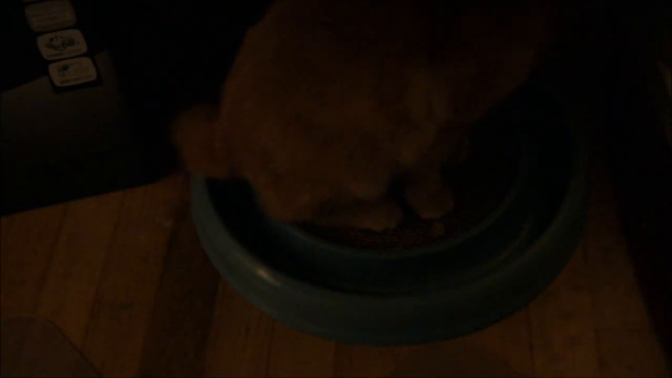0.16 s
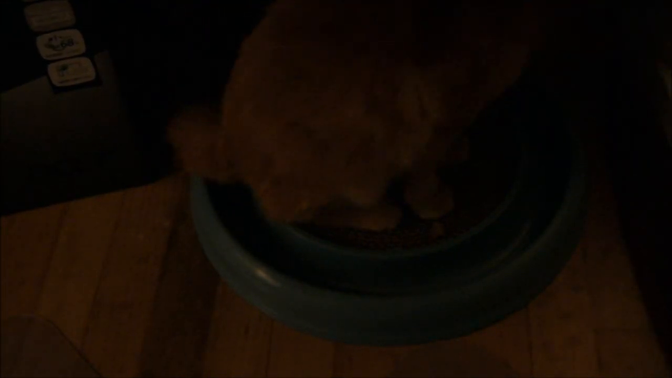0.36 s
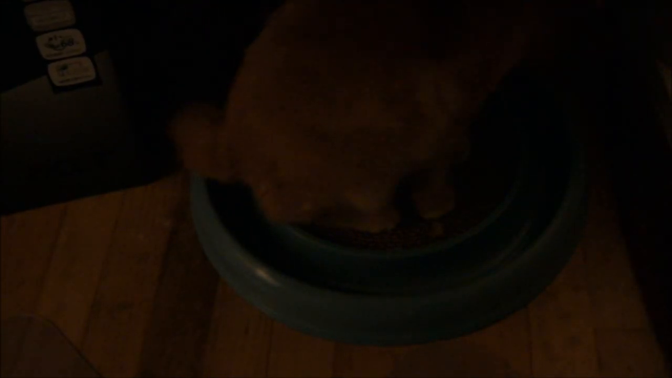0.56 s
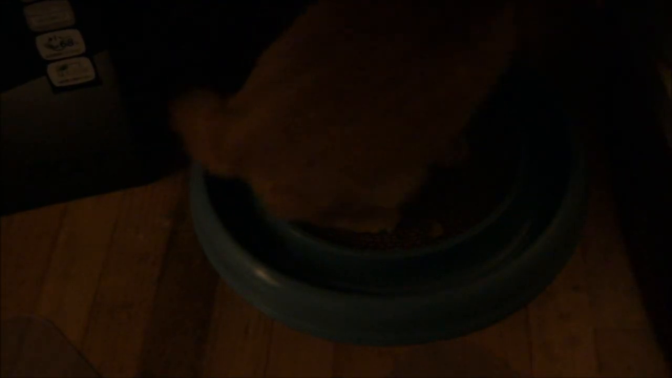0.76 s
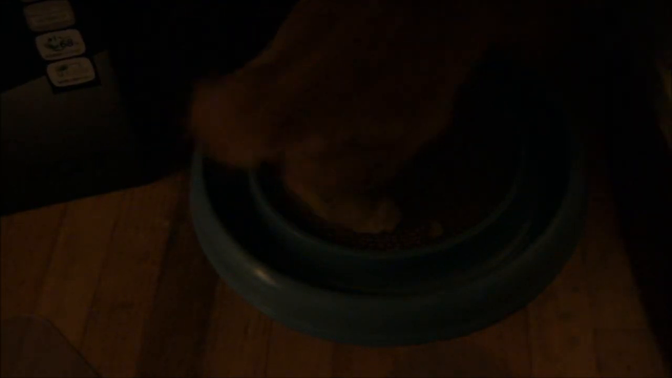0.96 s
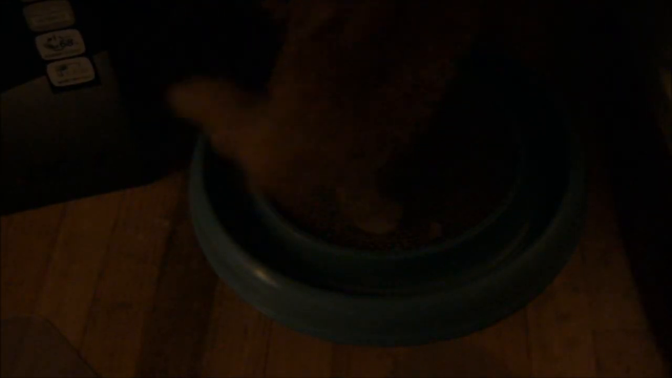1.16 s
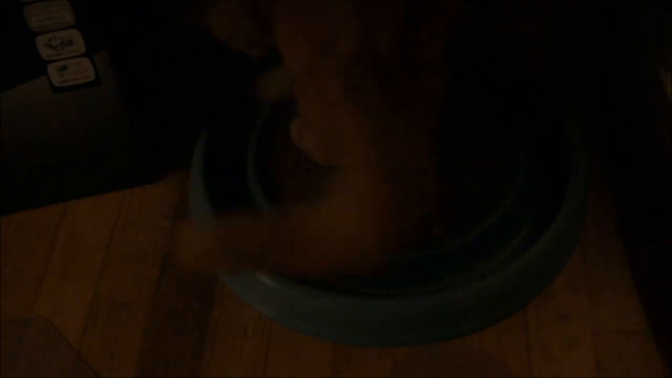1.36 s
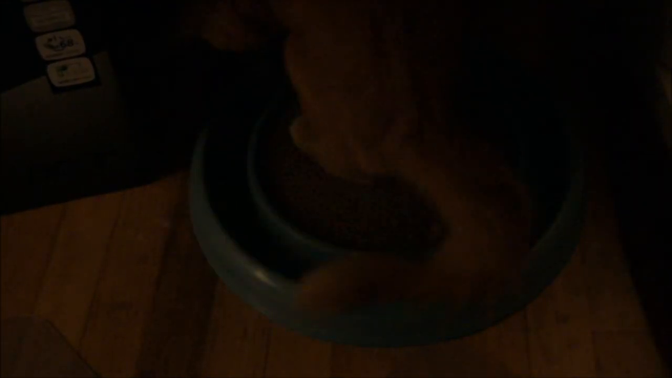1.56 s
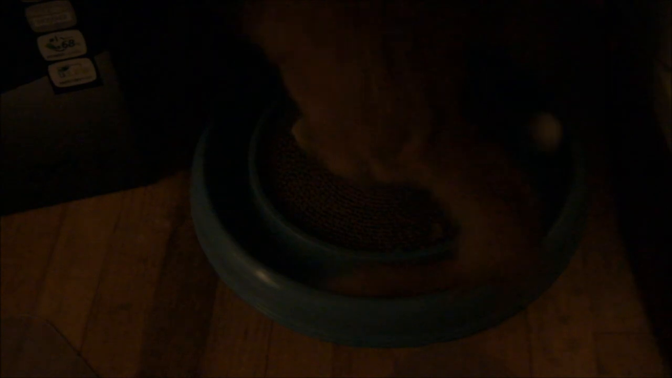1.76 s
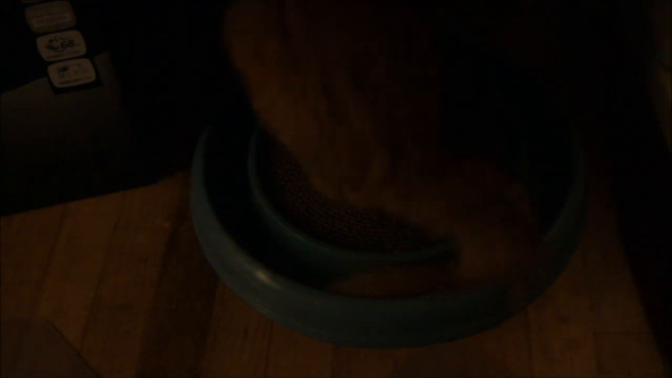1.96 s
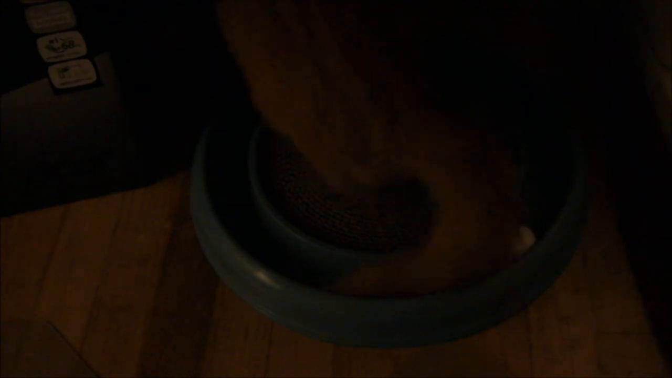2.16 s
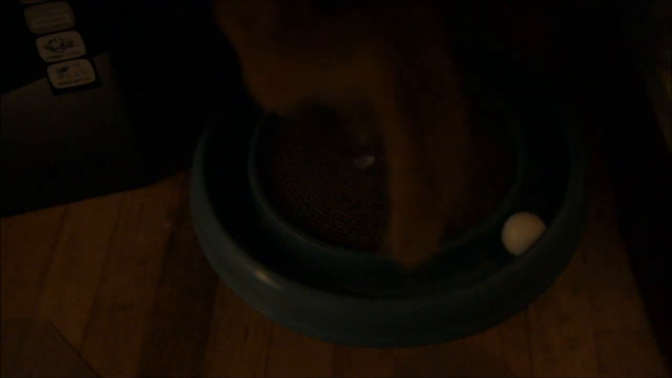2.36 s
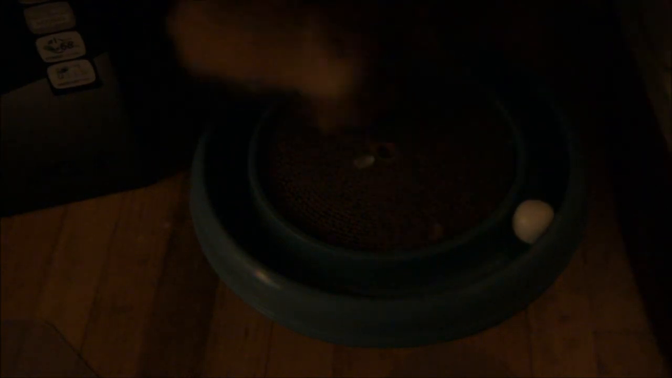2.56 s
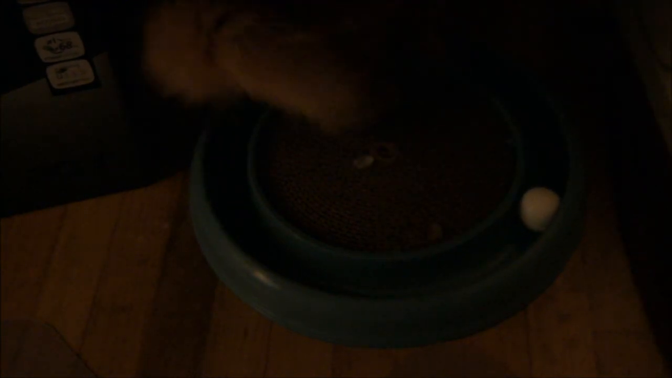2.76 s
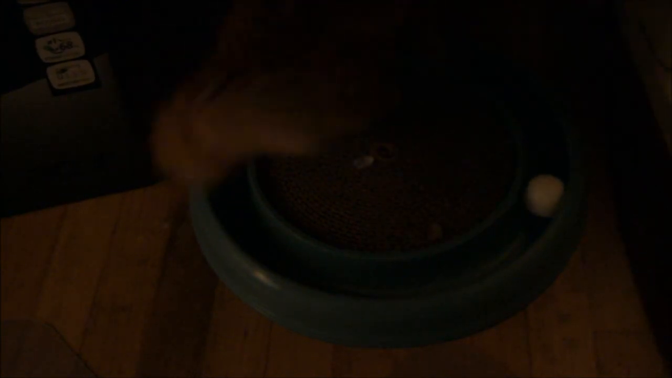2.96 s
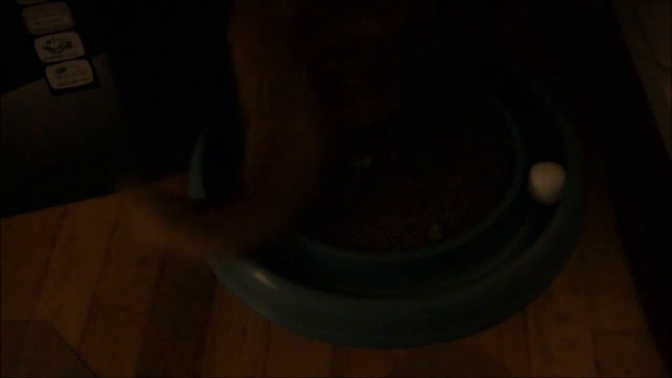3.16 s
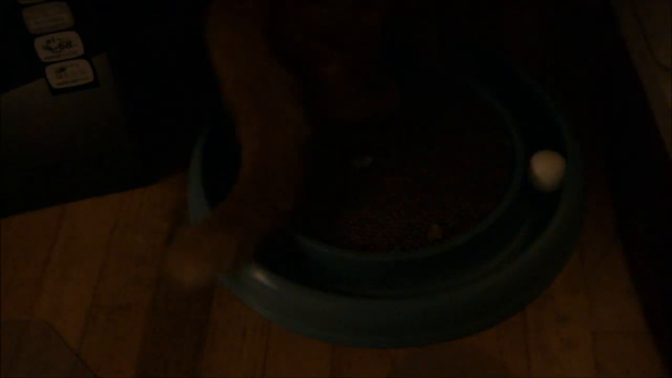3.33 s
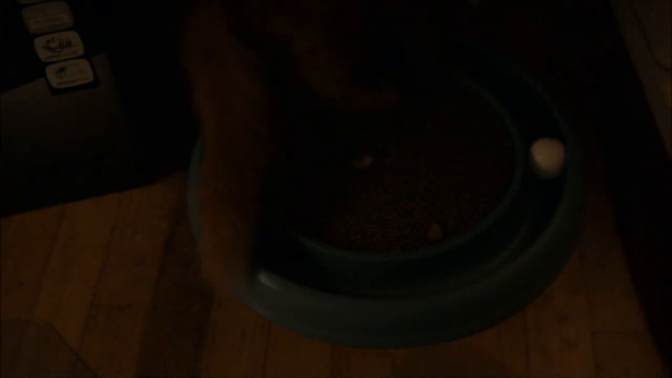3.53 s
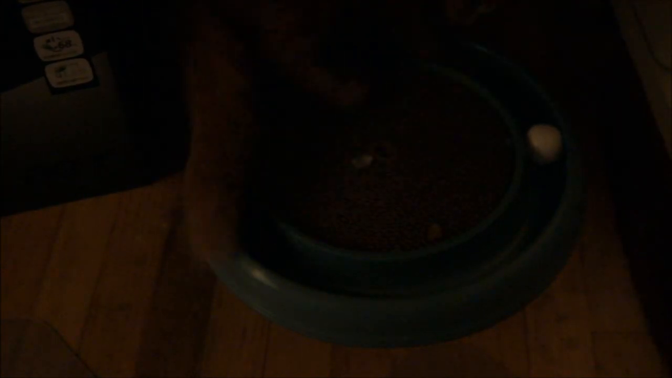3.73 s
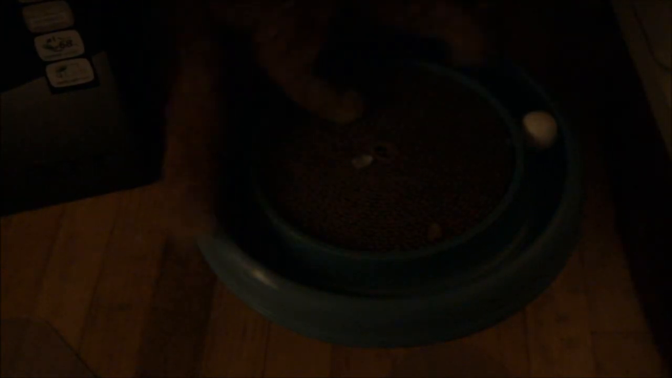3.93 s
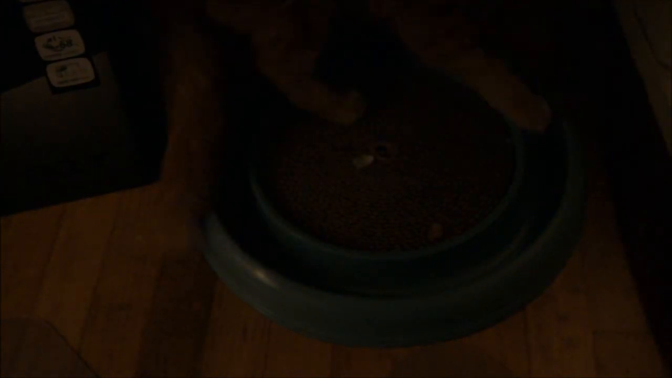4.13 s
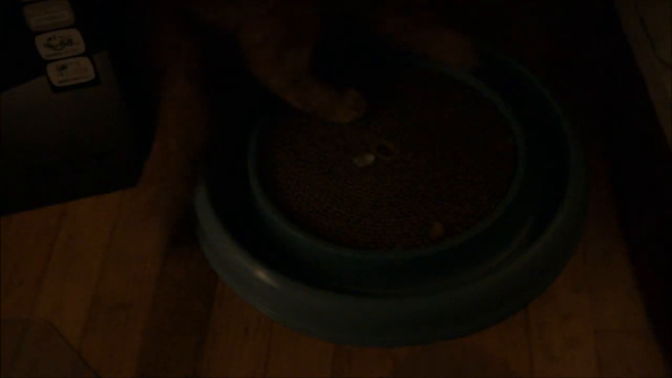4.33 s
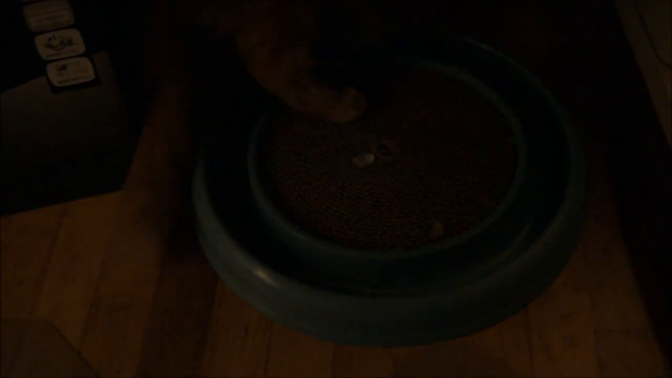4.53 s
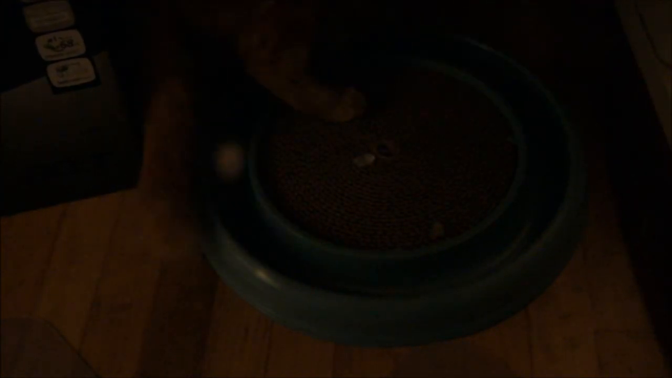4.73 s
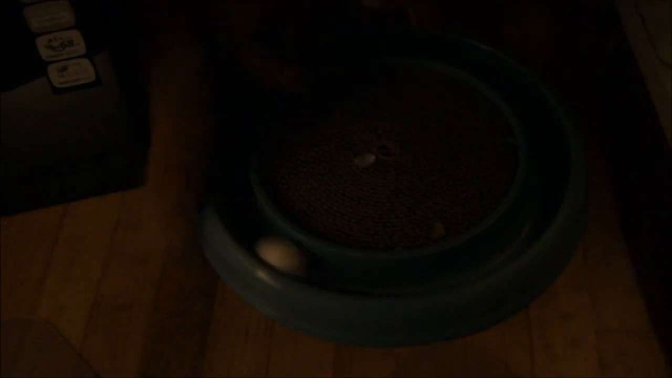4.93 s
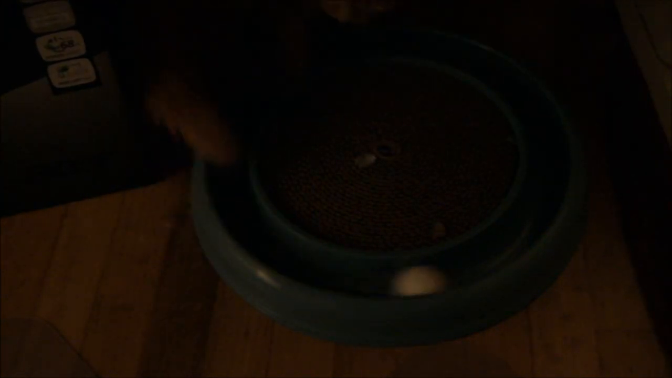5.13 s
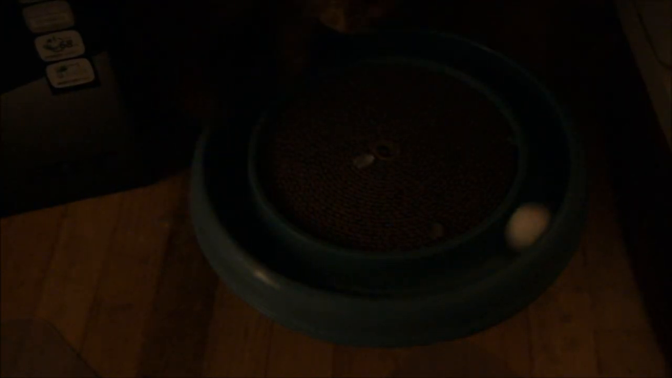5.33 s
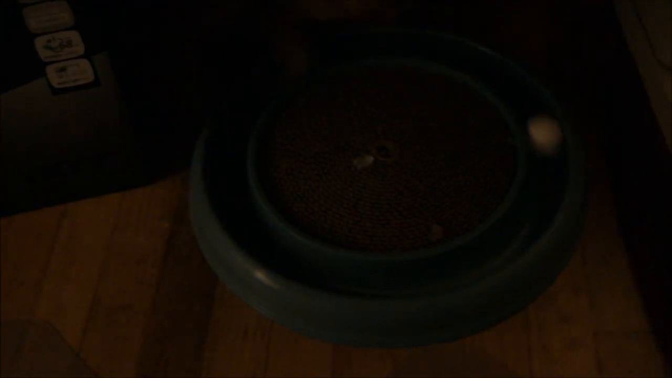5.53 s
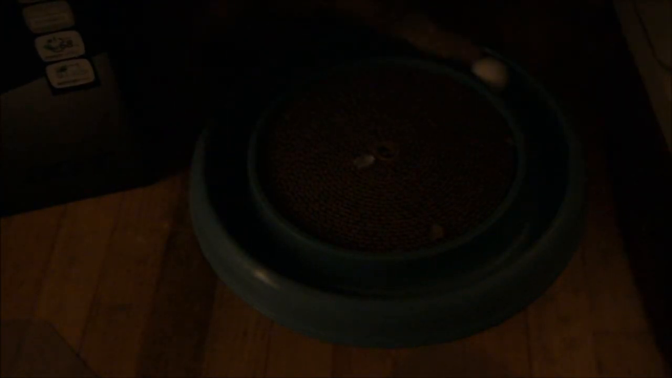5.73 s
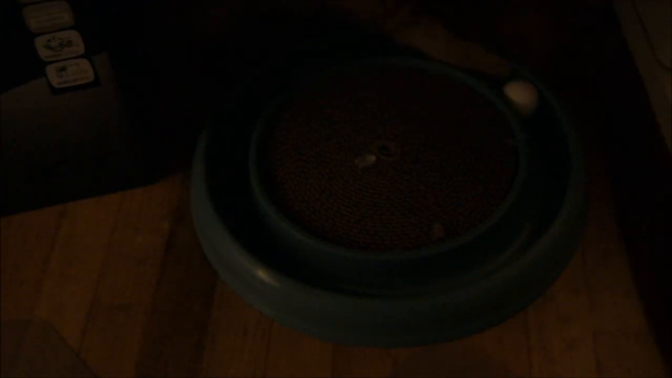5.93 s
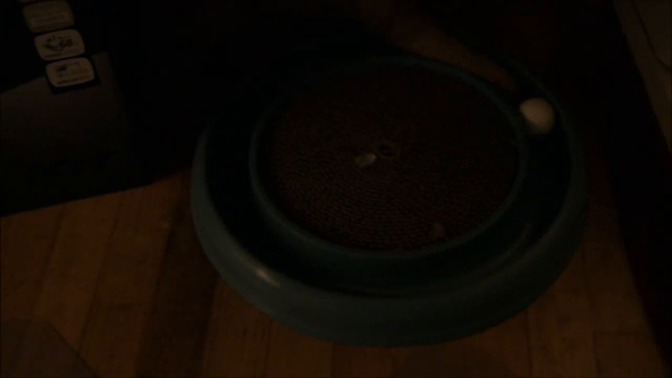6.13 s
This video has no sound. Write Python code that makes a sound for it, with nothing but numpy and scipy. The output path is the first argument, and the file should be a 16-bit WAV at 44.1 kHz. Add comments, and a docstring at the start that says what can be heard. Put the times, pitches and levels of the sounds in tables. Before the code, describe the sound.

In a small quiet room, a cat bats a light ball round a hollow plastic track. A few faint knocks come first, then a burst of loud hollow thumps and rolling rattle, a lull with small taps, and a longer second run of clattering that stops on a hard knock. Fur rustles softly; close stereo microphone, faint room hush.

```python
"""First a few light knocks over a faint roll, then bursts of batting: a cat drives a plastic ball round
a hollow plastic track on a wooden floor, in a small quiet room.
Bumps of the roll and knocks on the groove's walls excite the same shell modes; contacts also tick.
Paws and fur rustle as patchy filtered noise; a far appliance adds thin tones to the hush of the room.
The microphone housing cuts narrow dips into everything."""
import sys
import numpy as np
from scipy import signal
from scipy.fft import rfft, irfft
from scipy.io import wavfile

SR = 44100
rng = np.random.default_rng(int(sys.argv[2]) if len(sys.argv) > 2 else 0)


def file_out(sig):
    """Save sig as 16-bit WAV at sys.argv[1]."""
    # one column per channel
    cols = np.atleast_2d(sig).T
    # limit, then scale
    lim = np.clip(cols, -1, 1)
    pcm = np.round(lim * 32767).astype(np.int16)
    wavfile.write(sys.argv[1], SR, pcm)


def gain_from_db(level_db):
    """Convert decibel levels to linear amplitude factors (20 dB per decade)."""
    decades = np.asarray(level_db, float) / 20
    return 10 ** decades


N = 272979  # samples
LEFT_RIGHT = np.array([[1], [-1]])  # a side signal enters the two channels with opposite signs


def colour(x, db_of_hz):
    """Minimum-phase filtering: a folded cepstrum gives a causal response with the given dB gain over Hz."""
    size = 4096
    hz = np.arange(size // 2 + 1) * SR / size
    cepstrum = irfft(np.log(gain_from_db(db_of_hz(hz))))
    cepstrum[1:size // 2] *= 2
    cepstrum[size // 2 + 1:] = 0
    response = irfft(np.exp(rfft(cepstrum)))[:size // 2]
    return signal.oaconvolve(x, response)[:len(x)]


def shape(points):
    """Logarithmic frequency scale: straight lines through (Hz, value) points."""
    hz, value = np.transpose(points)
    return lambda f: np.interp(np.log(f + 1), np.log(hz), value)


def unit(x):
    """Normalisation to an rms value of 1."""
    return x / np.sqrt(np.mean(x ** 2))


def walk(rate):
    """Slow random modulation: levels 1 / rate s apart joined by smooth steps, rms 1."""
    place = np.arange(N) * rate / SR
    levels = rng.standard_normal(int(place[-1]) + 2)
    k = place.astype(int)
    part = (place - k) ** 2 * (3 - 2 * (place - k))
    return unit(levels[k] + part * (levels[k + 1] - levels[k]))


def spikes(per_second, spread_db):
    """Impulsive noise: random clicks of either sign, a few much larger than the rest."""
    happens = rng.random(N) < per_second / SR
    return unit(happens * rng.standard_normal(N) * gain_from_db(spread_db * rng.exponential(size=N)))


def ring(x, hz, t60):
    """Damped resonance: a two-pole filter rings one mode, to a peak near 1 for a unit blow."""
    pole = np.exp(2j * np.pi * hz / SR - np.log(1000) / (t60 * SR))
    return signal.lfilter([0, pole.imag], [1, -2 * pole.real, abs(pole) ** 2], x)


# spectrum of the room's hush: pitch_hz [Hz], level_db [dB, relative density]
HUSH_SPECTRUM = [(30, -14.5), (60, -14.5), (92, -21.5), (160, -7), (250, 1), (500, -4.5), (800, -3),
                 (1250, -6.5), (1900, -14), (2900, -8), (4200, -16), (7000, -28), (14000, -39.5)]
# likeness of the hush at left and right: pitch_hz [Hz], likeness [0-1]
HUSH_LIKENESS = [(60, 0.9), (130, 0.94), (290, 0.86), (630, 0.34), (1380, 0.3), (3020, 0.1), (6610, 0.07),
                 (14500, 0.05)]
# thin tones of the appliance: pitch_hz [Hz], level_db [dB rms, before slow drift and the microphone]
APPLIANCE_TONES = [(1197, -62), (1920, -79), (3001, -84), (10680, -83)]
HUSH_DB = -54.5  # level of the part common to both channels


def air():
    """Diffuse noise, coherent in the bass and less so above, with drifting tones of a distant appliance."""
    def likeness(f):
        return np.clip(shape(HUSH_LIKENESS)(f), .01, .97)

    def side_db(f):
        return shape(HUSH_SPECTRUM)(f) + 10 * np.log10((1 - likeness(f)) / (1 + likeness(f)))

    def restless_noise():
        return rng.standard_normal(N) * gain_from_db(0.7 * walk(19))

    mid = colour(restless_noise(), shape(HUSH_SPECTRUM))
    side = colour(restless_noise(), side_db)
    both = (mid + side * LEFT_RIGHT) * gain_from_db(HUSH_DB) / np.std(mid)
    for hz, db in APPLIANCE_TONES:
        phase = 2 * np.pi * np.cumsum(hz + 1.52 * walk(6)) / SR
        level = gain_from_db(db + 0.29 * walk(4.7)) * np.sqrt(2)
        both = both + level * np.sin(phase + 0.3 * LEFT_RIGHT)
    return both


# decay of the echoes: pitch_hz [Hz], t60_s [s]
ROOM_DECAY = [(200, 0.18), (1000, 0.19), (4000, 0.12), (12000, 0.23)]
# colour of the side part of the echoes: pitch_hz [Hz], level_db [dB]
ROOM_WIDTH = [(150, -18), (500, -10.5), (1000, -6.5), (2500, 1.5), (8000, 3)]


def room(x):
    """Reverberation: close walls answer with dense noise tails that decay by band and widen in the treble.
    The ball keeps moving, so three places on the track take turns, each with its own echoes."""
    t = np.arange(int(.3 * SR)) / SR
    edges = np.geomspace(100, 16000, num=9)
    tail = 0
    for lo, hi in zip(edges, edges[1:]):
        bandpass = signal.butter(2, [lo, hi], "bandpass", fs=SR, output="sos")
        band = signal.sosfilt(bandpass, rng.standard_normal((3, 2, len(t))))  # places, mid and side, time
        decay = 1000. ** (-t / shape(ROOM_DECAY)(lo))
        tail = tail + band * decay * np.clip(t / 0.0013, 0, 1)
    tail = tail / np.linalg.norm(tail, axis=-1, keepdims=True)
    share = gain_from_db([5 * walk(9) for _ in tail])
    share = share / np.linalg.norm(share, axis=0)
    echoes = signal.oaconvolve((x * share)[:, None], tail, axes=-1)
    mid, side = echoes.sum(axis=0)[:, :N]
    return x + gain_from_db(-5) * mid + gain_from_db(-5.5) * colour(side, shape(ROOM_WIDTH)) * LEFT_RIGHT


# course of the roll: start_s [s], level_db [dB, relative], boom_db [dB, extra for the low modes,
# most on the far side of the ring]
ROLL_COURSE = [(0.0, -53, 3), (0.22, -60.5, 0.5), (1.2, -61.5, -8.5), (1.3, -51.5, 1), (1.45, -44.5, 1),
               (1.59, -41, 1.5), (1.71, -39.5, 6), (1.78, -35.5, -1.5), (1.93, -39, 1.5), (1.98, -40.5, -3),
               (2.08, -44, 2), (2.15, -55, -4.5), (2.72, -57, -11), (4.12, -57.5, -4), (4.24, -47.5, -3),
               (4.36, -41.5, 5.5), (4.45, -36, -2.5), (4.59, -37.5, -3.5), (5.0, -36.5, -8),
               (5.38, -38.5, -11.5), (5.41, -46.5, -1.5), (5.55, -43.5, 1), (5.69, -41, 3),
               (5.82, -38.5, 0.5), (5.85, -55, -5), (5.95, -57, 3), (6.19, -55.5, -1.5)]


def roll_levels():
    """Slow envelope: the roll level and its boom follow straight lines in dB."""
    s, roll_db, boom_db = np.transpose(ROLL_COURSE)
    t = np.arange(N) / SR
    return np.interp(t, s, roll_db), np.interp(t, s, boom_db)


# ball or paw hits the track: start_s [s], peak_db [dB, relative], boom_db [dB, extra for the low modes],
# hardness_db [dB, extra for the high modes and the tick]
BLOWS = [(0.012, -44, 2, -14), (0.047, -32.5, -5, -5.5), (0.073, -37, 5, -10.5), (0.119, -27.5, -0.5, -7),
         (0.238, -46, 1.5, -10), (0.593, -32.5, -1.5, -12.5), (1.266, -32.5, -4, -7.5),
         (1.285, -41, 6, 6.5), (1.409, -36, 5, -12), (1.534, -25, -3, -11.5), (1.549, -26.5, 0, -13),
         (1.574, -17.5, -10, -17.5), (1.6, -18, -1, -20), (1.619, -7, -10, -15.5), (1.641, -15, -2.5, -12),
         (1.659, -22, -6, -25), (1.693, -28, 6, -7.5), (1.724, -28, 5, -14), (1.784, -25, 1, -8.5),
         (1.835, -29, -1, -8), (1.87, -22, -6, -8.5), (1.912, -23.5, -6, -13.5), (1.942, -15.5, -11, -11),
         (2.009, -25, -8, -17), (2.028, -25.5, -8, -11), (2.067, -21.5, -15, -13.5), (2.075, -26, -3, -2),
         (2.084, -16.5, -30, -12), (2.342, -39, -15, -12), (2.394, -41.5, -15, -15),
         (2.49, -44.5, -0.5, -5), (3.447, -32, -3.5, -9.5), (3.478, -29.5, -9, -12.5),
         (3.539, -35, -5.5, -15), (3.565, -36.5, -7, -16.5), (3.615, -41, -5, -16), (3.64, -37, -4, -13.5),
         (3.841, -37, -16, -23), (3.945, -40.5, -6, -21), (4.14, -29.5, -14, -18), (4.212, -32.5, 1, -6.5),
         (4.252, -30, 4, -10), (4.412, -24, 2.5, -26), (4.423, -13, -4.5, -10), (4.454, -21.5, -26, -16),
         (4.556, -24.5, -26, -11), (4.61, -15.5, -8, -8.5), (4.678, -21, -9, -14), (4.69, -22, -22, -17.5),
         (4.75, -25.5, -24, -10.5), (4.766, -22.5, -9.5, -4.5), (4.933, -27, -21, -13),
         (4.987, -13.5, -36, -16.5), (5.044, -22.5, -24, -34), (5.207, -23.5, -9.5, -15),
         (5.231, -32, -23, -19), (5.279, -22, -11, -12), (5.354, -22.5, -33, -16.5),
         (5.426, -29.5, -20, -16), (5.454, -24, -8, -16), (5.466, -23, -7, -6.5), (5.516, -20, -9, -19.5),
         (5.544, -23, -12, -20), (5.593, -30, 0, -7), (5.608, -17.5, -6, -10.5), (5.641, -15.5, -38, -15),
         (5.651, -23, -24, -34), (5.672, -25, -4, -10), (5.74, -22, -1, -9.5), (5.811, -24, -4, -4.5),
         (5.86, -6.5, -3.5, -17.5)]
# a claw catches the rim, a tick that rings no mode: start_s [s], level_db [dB, relative]
CLAW_TICKS = [(1.499, -50), (1.955, -43), (4.299, -50), (4.32, -34), (5.185, -46.5), (5.81, -30.5),
              (5.86, -29.5)]
TICK_DB = -11  # contact tick of a blow, against its peak and hardness


def contacts():
    """Impulsive excitation: every hard contact, blow or claw, is one click of its tick size."""
    s, peak_db, _, hard_db = np.transpose(BLOWS)
    claw_s, claw_db = np.transpose(CLAW_TICKS)
    times = np.r_[s, claw_s]
    levels_db = np.r_[peak_db + hard_db + TICK_DB, claw_db]
    clicks = np.zeros(N)
    np.add.at(clicks, (times * SR).astype(int), gain_from_db(levels_db))
    return clicks


# paws and fur sweep over card and plastic: peak_s [s], length_s [s], level_db [dB, relative],
# swish_db [dB, fine swish against the level]
PAW_STROKES = [(0.032, .15, -72, -15), (1.28, 0.043, -60, -2), (1.344, 0.1, -48, -10),
               (1.5, .08, -53, -1.5), (1.566, .05, -60, -18), (3.732, 0.034, -68, 6),
               (4.32, 0.096, -47.5, -6.5), (4.477, .07, -55, -13), (4.653, 0.041, -52, -21),
               (4.96, 0.033, -53.5, -7), (5.19, 0.031, -63, -1), (5.25, .05, -65, -18),
               (5.468, .06, -66, -18)]
STROKE_RISE, STROKE_FADE_DB = .5, -14.5  # rise as a share of the length; level lost over rise and over length
FLOOR_DB, FLOOR_SWISH_DB = -70, -6  # steady faint treble hiss under everything
SCRAPE_DB, SCRAPE_SWISH_DB = -20.5, -16  # the ball scrapes as it rolls: against the roll; swish against scrape
CONTACT_HISS_DB, CONTACT_HISS_S = -19.5, 0.0077  # each contact's highest treble, a brief fine hiss: dB, decay


def hiss_levels(roll_db):
    """Power addition of uncorrelated hisses: steady floor, scrape, strokes, contacts; level and swish in dB."""
    t = np.arange(N) / SR
    scrape_db = roll_db + SCRAPE_DB
    hiss = gain_from_db(FLOOR_DB) ** 2 + gain_from_db(scrape_db) ** 2
    swish = gain_from_db(FLOOR_DB + FLOOR_SWISH_DB) ** 2 + gain_from_db(scrape_db + SCRAPE_SWISH_DB) ** 2
    for s, length, db, swish_db in PAW_STROKES:
        distance = np.maximum((t - s) / length, (s - t) / (STROKE_RISE * length))
        power = gain_from_db(db + STROKE_FADE_DB * distance) ** 2
        hiss = hiss + power
        swish = swish + power * gain_from_db(swish_db) ** 2
    contact_hiss = signal.lfilter([1], [1, -np.exp(-1 / (CONTACT_HISS_S * SR))], contacts())
    swish = swish + (gain_from_db(CONTACT_HISS_DB) * contact_hiss) ** 2
    return 10 * np.log10(hiss), 10 * np.log10(swish / hiss)


# spectrum of fur and claws rubbing: pitch_hz [Hz], level_db [dB]
RUSTLE_SPECTRUM = [(800, -10), (2000, 4), (4300, 2.5), (7000, -11), (9000, -23), (14000, -24)]
# spectrum of the finest hiss: pitch_hz [Hz], level_db [dB]
SWISH_SPECTRUM = [(4000, -25), (7000, -2), (9500, -6), (14000, -18.5)]


def rustle(db, swish_db):
    """Friction noise: fur and claws on card and plastic hiss in patches with crackle, hardly alike left and right."""
    patchy = gain_from_db(db + 1.9 * walk(40))

    def grain():
        return rng.standard_normal(N) + .4 * spikes(900, spread_db=4.5)

    def brush():
        coarse = unit(colour(grain(), shape(RUSTLE_SPECTRUM)))
        fine = unit(colour(grain(), shape(SWISH_SPECTRUM)))
        return coarse + gain_from_db(swish_db) * fine

    return patchy * (0.99 * brush() + 0.85 * brush() * LEFT_RIGHT)


# spectrum of a hard contact: pitch_hz [Hz], level_db [dB]
TICK_SPECTRUM = [(1500, 1), (2800, 7.5), (4300, 2.5), (6500, -7.5), (9000, -14.5), (13000, -41),
                 (16000, -49)]


def ticks():
    """Contact noise: each hard contact is a noise crack of a few milliseconds with a short hiss behind it."""
    t = np.arange(SR // 20) / SR
    decay = np.exp(-t / 0.0024) + 0.23 * np.exp(-t / 0.0099)
    fade = (1 - np.exp(-t / 0.001)) * decay
    envelope = signal.oaconvolve(contacts(), fade)[:N]
    return gain_from_db(6.5) * envelope * unit(colour(rng.standard_normal(N), shape(TICK_SPECTRUM)))


# modes of the track shell: pitch_hz [Hz], level_db [dB, relative], t60_s [s]
SHELL_MODES = [(270, -4.5, 0.1), (289, -6.5, 0.031), (339, -12.5, 0.051), (421, 2, 0.064),
               (458, 2.5, 0.011), (518.3, 2, 0.059), (545.8, 0, 0.057), (613, -4.5, 0.025),
               (713, -7, 0.038), (775.6, -1, 0.06), (833.6, 0.5, 0.042), (884, -7.5, 0.058),
               (981, -3.5, 0.031), (1041, -3.5, 0.034), (1125, -17, 0.04), (1260, -12.5, 0.037),
               (1511, 5.5, 0.027), (1586, 3.5, 0.023), (1694, 2, 0.022), (1794, 3.5, 0.036),
               (1886, 1, 0.01), (2008, 5, 0.016), (2214, 5.5, 0.0082), (2812, 1.5, 0.014),
               (2980, -11, 0.0072)]
DEEP_TOP_HZ, BOOM_TOP_HZ, CLACK_LOW_HZ = 400, 650, 1400  # limits of the deep, low and high modes
ROLL_GRIP_DB = -26.5  # how hard the rolling surface drives the modes
# the deepest modes answer the soft weight of a paw more than the light ball:
# against the roll level; at the loudest blow; per dB of blow
DEEP_ROLL_DB, DEEP_KNOCK_DB, DEEP_DB_PER_DB = -3.5, -12.5, -0.54
PUSH_SIZE = 10  # samples


def track(boom_db, rattle_db):
    """Modal excitation: bumps of the roll and single knocks ring the shell; each knock weights the modes anew."""
    s, peak_db, low_db, high_db = np.transpose(BLOWS)
    deep_db = DEEP_KNOCK_DB + DEEP_DB_PER_DB * (peak_db - peak_db.max())
    place = rng.standard_normal((len(s), len(SHELL_MODES)))
    late = rng.random((len(s), len(SHELL_MODES)))
    bumps, grain = spikes(450, spread_db=2.0), rng.standard_normal(N)
    boom, rattle = gain_from_db(boom_db + ROLL_GRIP_DB), gain_from_db(rattle_db + ROLL_GRIP_DB)
    shell = 0
    for k, (hz, db, t60) in enumerate(SHELL_MODES):
        deep, low, high = hz < DEEP_TOP_HZ, hz < BOOM_TOP_HZ, hz > CLACK_LOW_HZ
        # fine surface grain drives the mode between bumps
        drive = bumps * (-1) ** k + 0.73 * np.roll(grain, k * SR // 4)
        if deep:
            roll = rattle * gain_from_db(DEEP_ROLL_DB)
        elif low:
            roll = boom
        else:
            roll = rattle
        # the ball travels, so its grip on each mode drifts
        drive *= roll * gain_from_db(db - 11.6 * high + 2.56 * walk(14))
        # a blow spreads round the ring, so the modes start up to a few milliseconds apart
        at = ((s + 0.00298 * late[:, k]) * SR).astype(int)
        blow_db = peak_db - 6.5 + low * low_db + deep * deep_db + high * high_db
        drive[at] += gain_from_db(blow_db + db + 2. * place[:, k])
        shell = shell + ring(drive, hz, t60)
    # plastic on plastic is a push of some tenths of a millisecond
    push = np.hanning(PUSH_SIZE)
    return signal.oaconvolve(shell, push / push.sum())[:N]


def scene():
    """Superposition: toy in the room, rustle and hush add up."""
    roll_db, boom_db = roll_levels()
    toy = track(roll_db + boom_db, roll_db) + ticks()
    # the small shell radiates little bass
    radiation = signal.butter(6, 272.5, "highpass", fs=SR, output="sos")
    toy = signal.sosfilt(radiation, toy)
    return gain_from_db(-1.0) * room(toy) + rustle(*hiss_levels(roll_db)) + air()


# dips cut by the microphone housing: pitch_hz [Hz], width_hz [Hz], depth_db [dB]
HOUSING_DIPS = [(590, 170, -3.5), (1405, 119, -12.5), (2388, 300, -14.5), (3398, 494, -11.5)]
# treble of the two microphone ports: pitch_hz [Hz], difference_db [dB, left minus right]
PORT_BALANCE = [(1500, 0.2), (4300, -1.5), (8000, -2), (13000, 5)]


def microphone(dry):
    """Linear filtering: housing dips, a different treble on each port and a cut top."""
    def port_db(f, way):
        dips = sum(db / (1 + (2 * (f - hz) / width) ** 2) for hz, width, db in HOUSING_DIPS)
        return dips + way * shape(PORT_BALANCE)(f) / 2

    left = colour(dry[0], lambda f: port_db(f, 1))
    right = colour(dry[1], lambda f: port_db(f, -1))
    top_cut = signal.ellip(10, .3, 50, 14100, fs=SR, output="sos")
    return signal.sosfilt(top_cut, [left, right])


def low_pass(x):
    """Removes everything above the highest recorded frequency."""
    return signal.sosfilt(signal.butter(12, 15060, fs=SR, output="sos"), x)


def record(dry):
    """Transduction: the microphone filters the sound and a small steady offset is added."""
    mix = microphone(dry) - .0025
    return low_pass(mix)


dry = scene()
out = record(dry)
file_out(out)
```